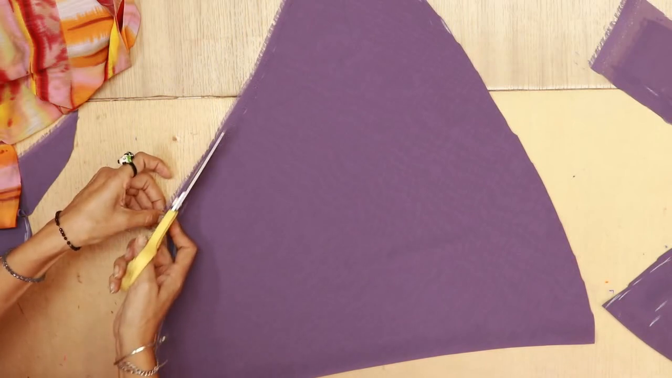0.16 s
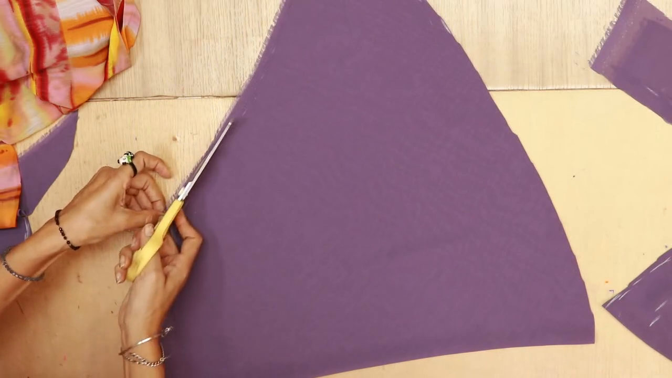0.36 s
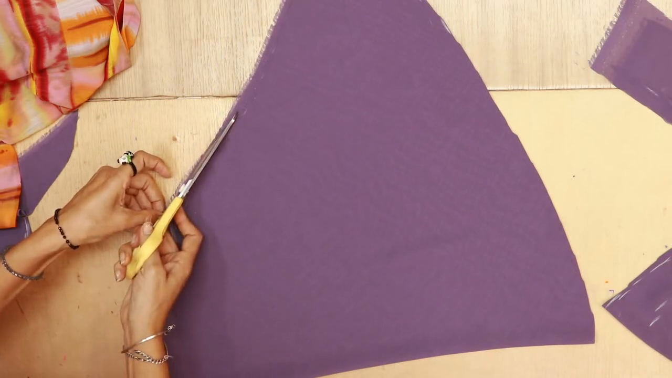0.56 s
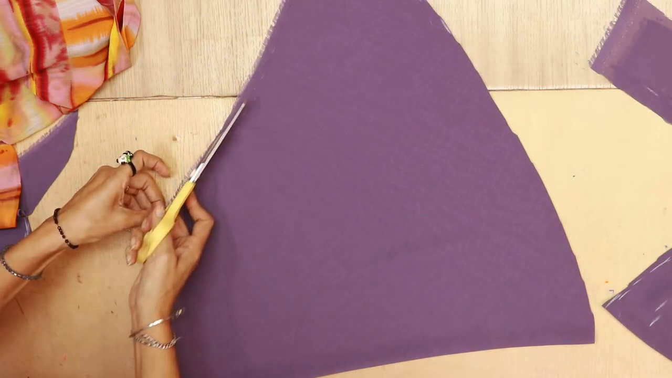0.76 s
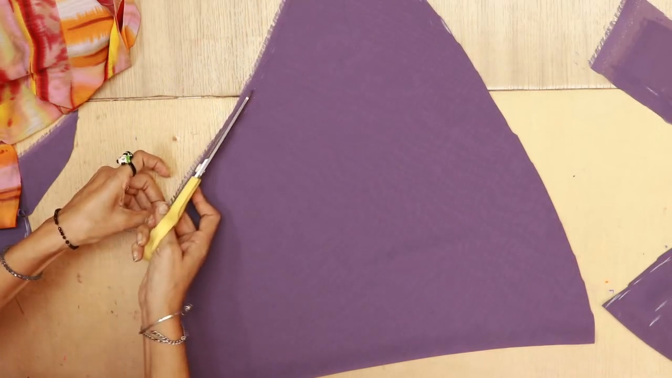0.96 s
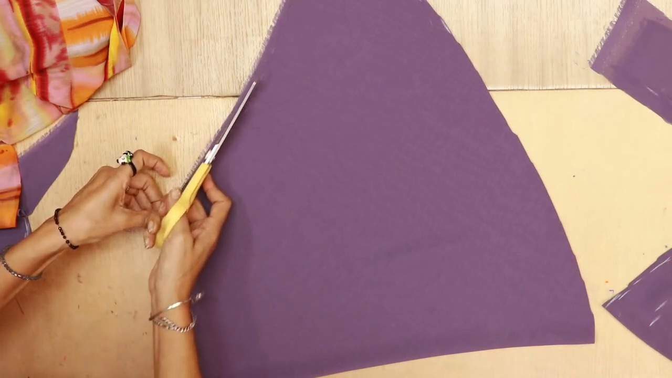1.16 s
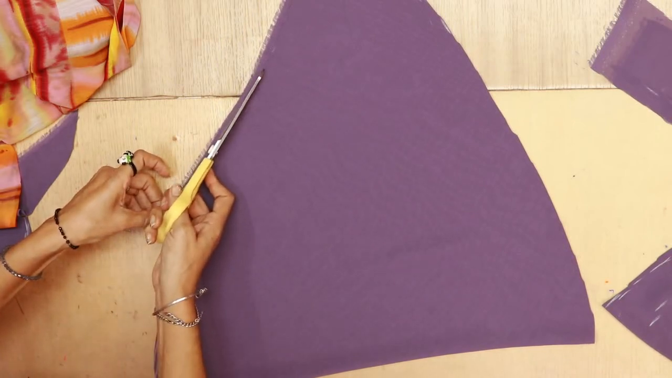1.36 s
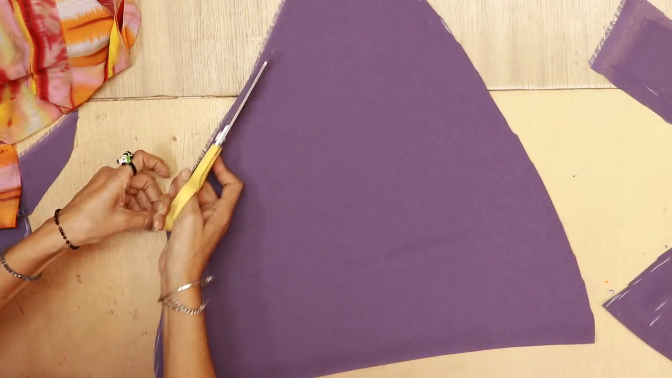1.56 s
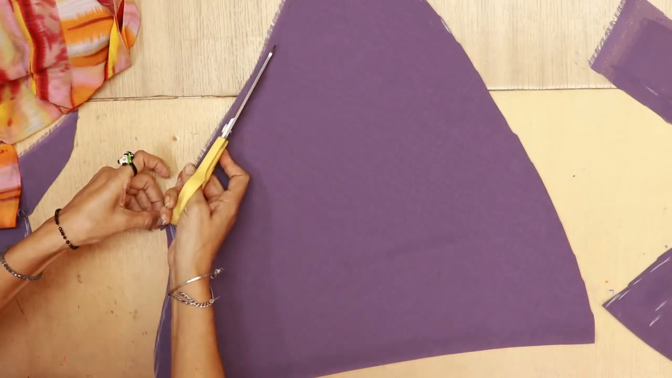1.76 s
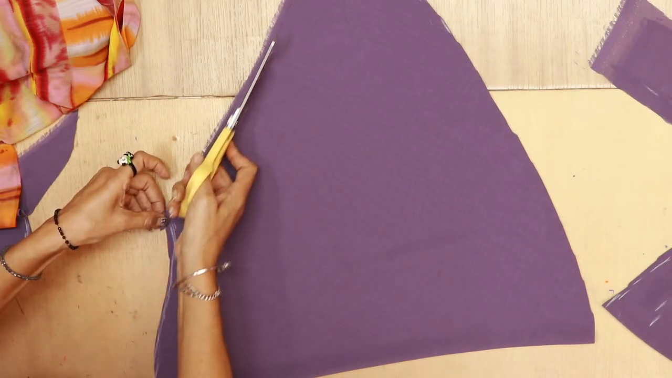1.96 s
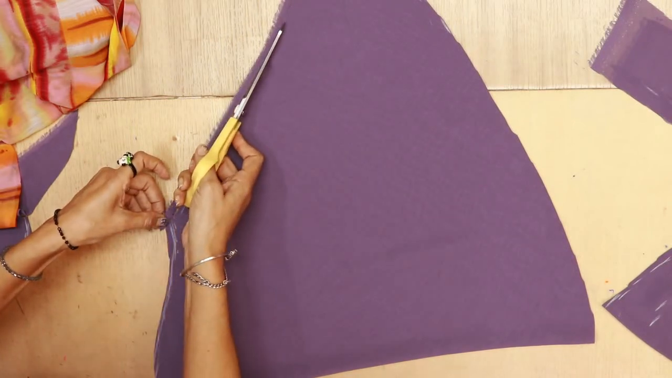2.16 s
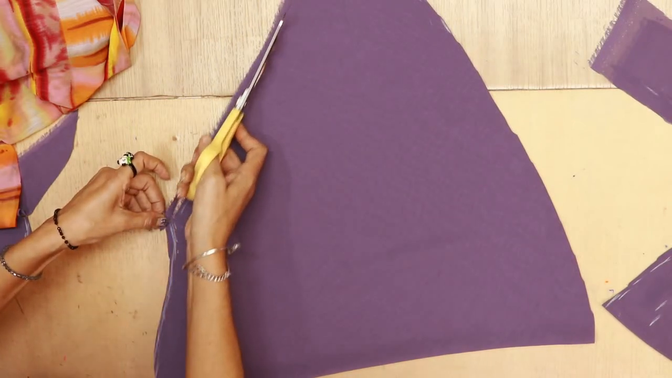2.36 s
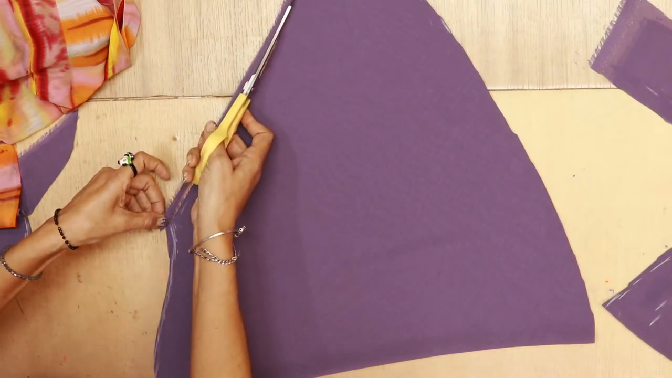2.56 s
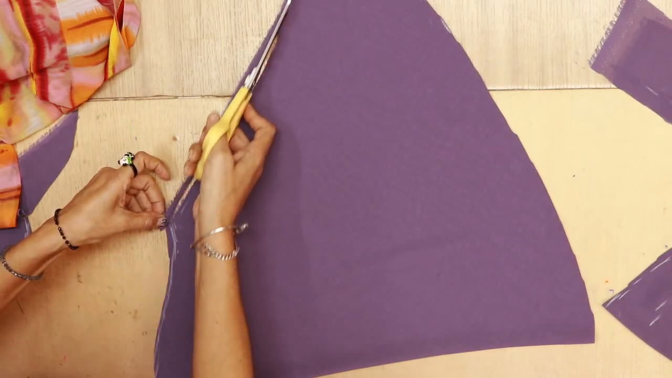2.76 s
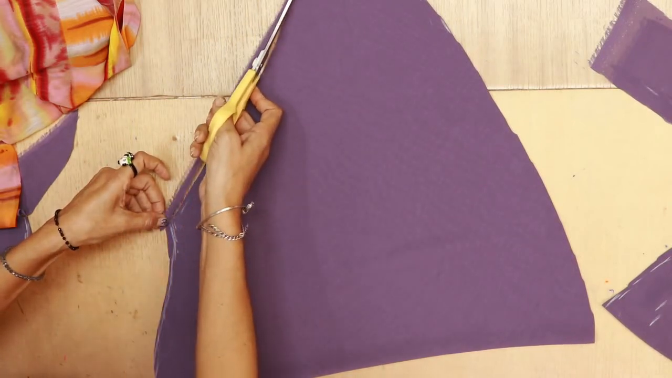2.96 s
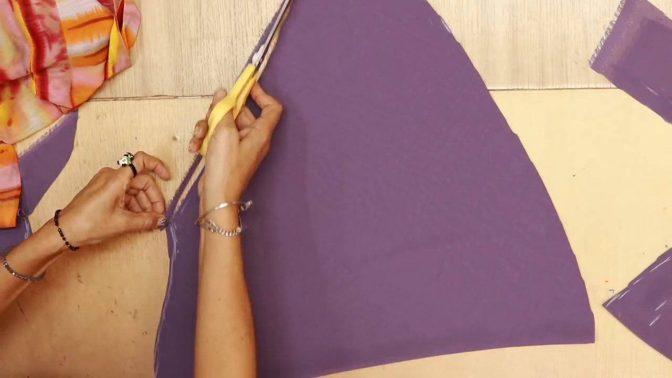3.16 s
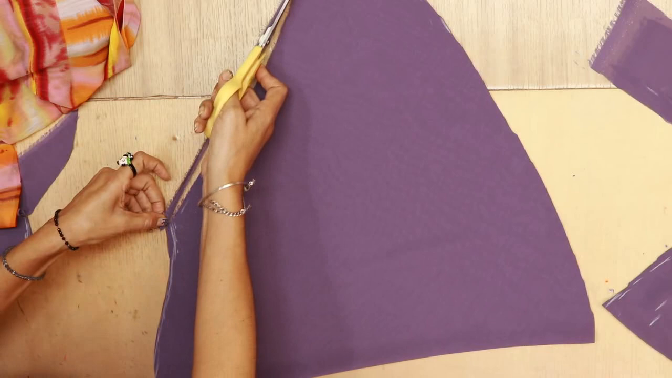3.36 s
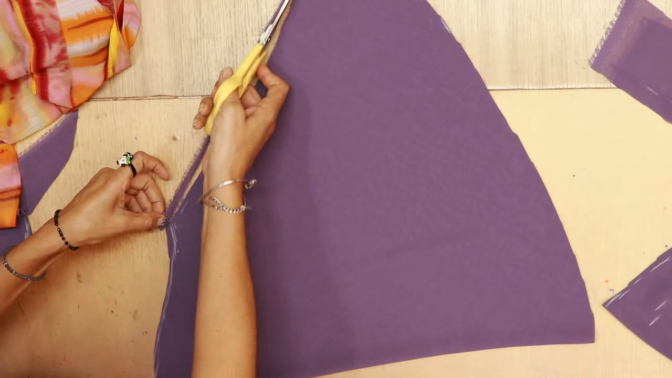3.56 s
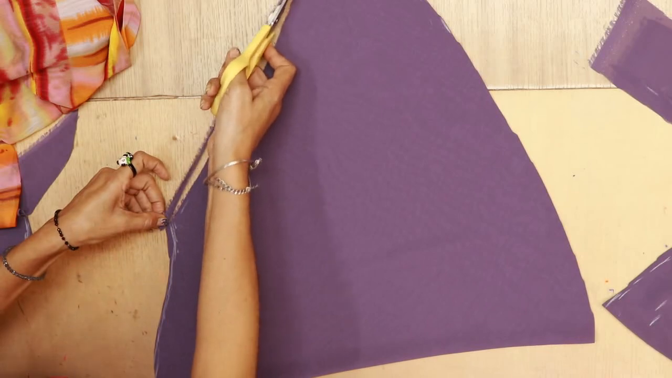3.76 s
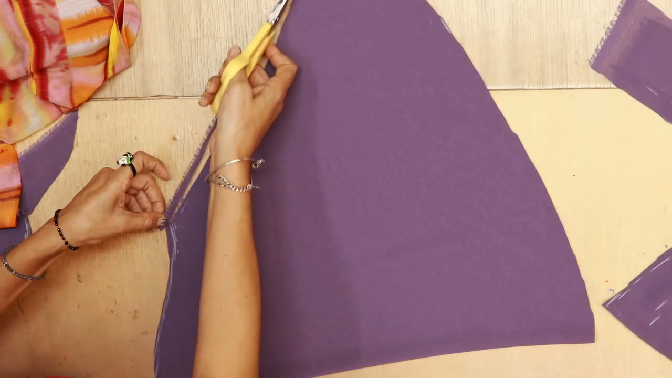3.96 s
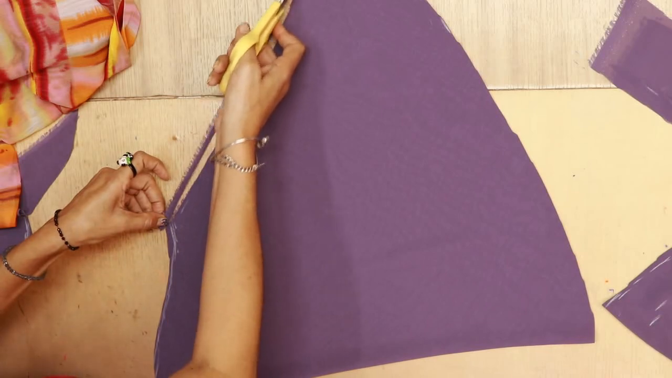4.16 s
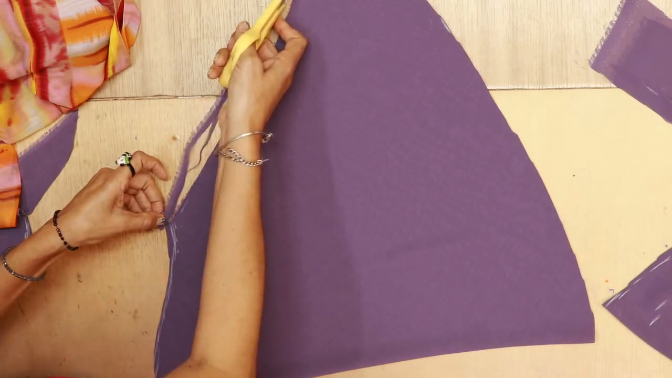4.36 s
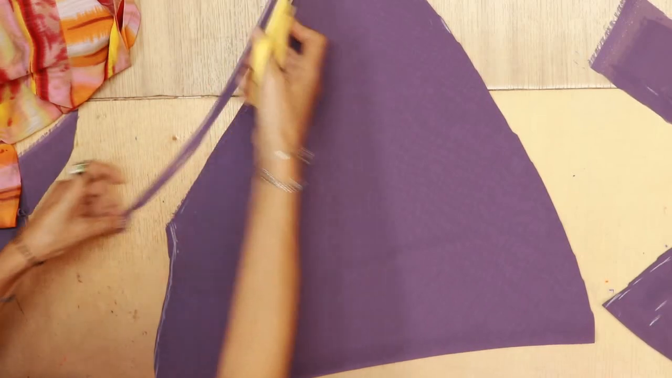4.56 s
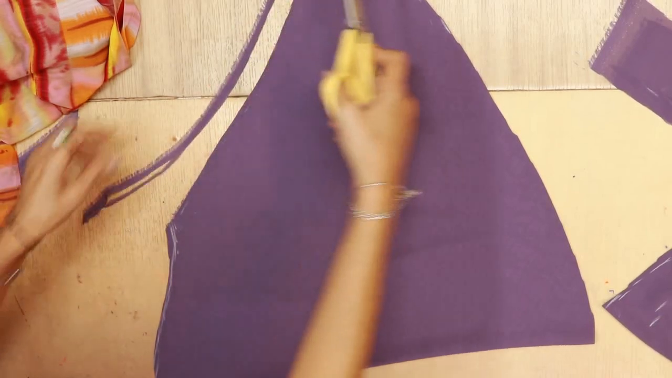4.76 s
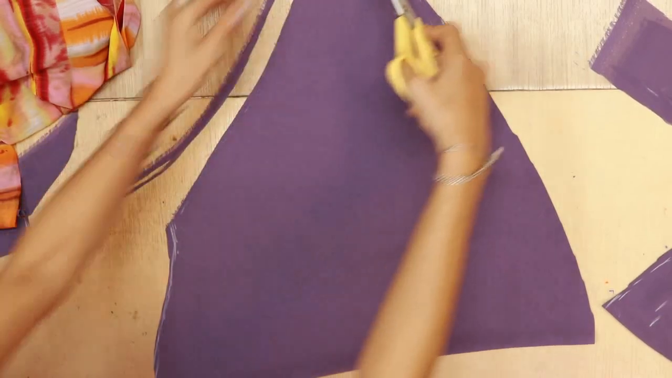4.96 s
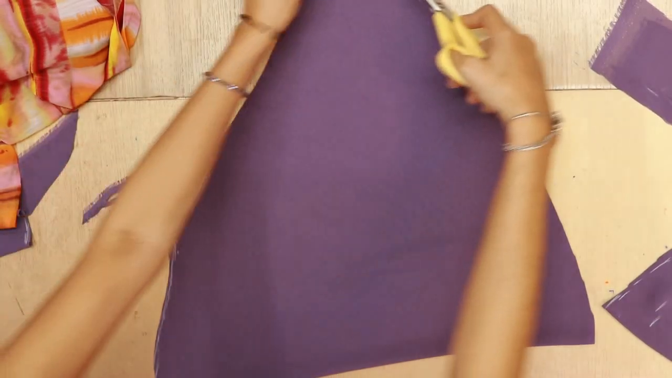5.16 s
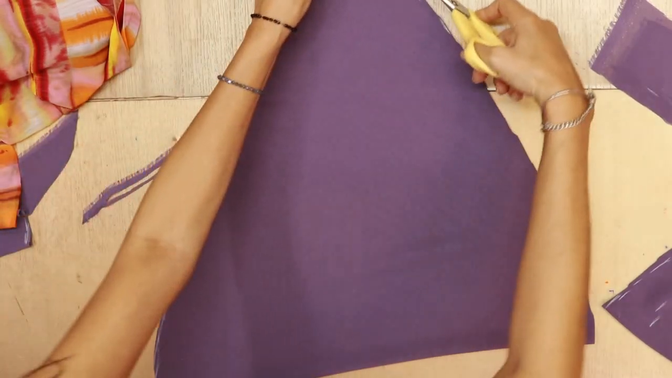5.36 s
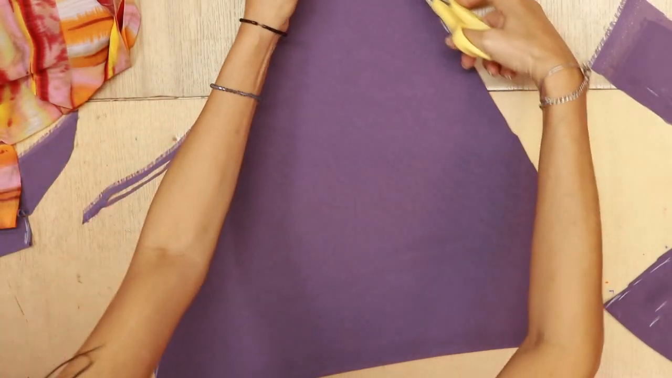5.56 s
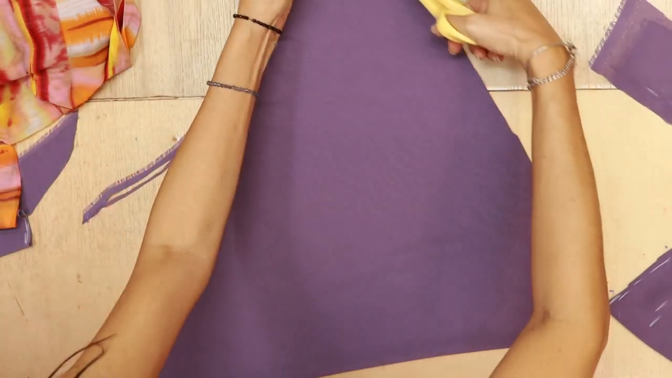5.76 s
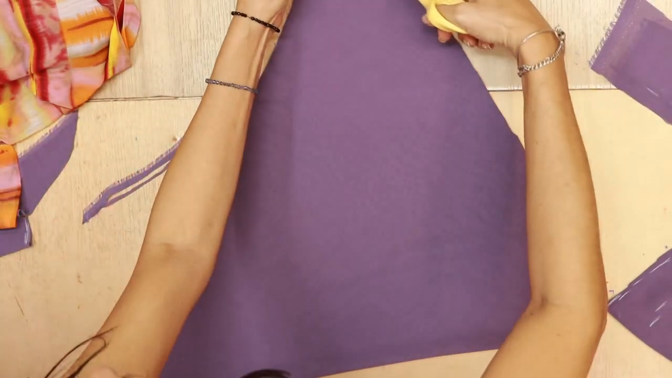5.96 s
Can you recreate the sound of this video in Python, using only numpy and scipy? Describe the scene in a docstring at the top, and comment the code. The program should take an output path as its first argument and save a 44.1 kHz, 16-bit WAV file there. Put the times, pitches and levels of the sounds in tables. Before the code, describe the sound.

A small, fairly dry room with low steady noise and a faint bass hum that swells around 3 s. Close stereo microphones catch tailor's scissors slightly left, drifting toward the middle. A cut is already biting at 0 s; others follow near 0.5, 0.95, 1.35, 1.8, 2.2, 2.6, 3.0, 3.5, 3.9 and 4.3 s. Each swells in with an edge hiss, then crunches through threads while the blade's jolts drum the wooden table; between cuts a softer reopening scrapes forward. Cuts gradually grow heavier, with small knocks near 1.4 and 3.9 s. At 4.33 s the blades shut with a bright, very short steel clack and heavy thud. A rough squeak follows at 4.5 s, then hands swish over cloth until about 5.8 s. Light jewellery ticks come at 5.2 s, a dull knock at 5.4 s, and a faint low squeak near 5.7 s.

```python
"""Tailor's scissors cut cloth in a small room, the lower blade resting on a wooden table, over noise and hum.
Cuts and reopenings alternate: snapping threads crackle in the blades, jolts drum in the table's decaying
modes, and each reopening scrapes forward more softly. The hum swells once midway. The last cut ends in a
steel clack, a few quick hits ringing the blades, with a heavy thud; squeaks follow as the blades reopen and
once near the end. Hands sweep the cloth (dense grains hiss), jewellery ticks, the scissors knock on the table."""
import sys
import numpy as np
from scipy import signal
from scipy.fft import rfft, irfft
from scipy.io import wavfile
from scipy.ndimage import uniform_filter1d, map_coordinates

SR = 44100
rng = np.random.default_rng(int(sys.argv[2]) if len(sys.argv) > 2 else 0)


def unload_wav(signal):
    """Save mono or channel-first audio to the path in sys.argv[1] as 16-bit WAV at rate SR, clipped to [-1, 1]."""
    wavfile.write(
        sys.argv[1],
        SR,
        np.round(np.clip(np.atleast_2d(signal).T, -1, 1) * 32767).astype(np.int16),
    )


N = 268569

# Closing strokes. Each row: bite in seconds, length in seconds, force as table boom in dB,
# table rattle in dB, edge hiss in dB.
CUT_STROKES = [(.008, 0.0081, -35.5, -32, -40), (.531, 0.063, -31, -31, -44.5),
               (0.947, .034, -28.5, -38.5, -44.5), (1.344, 0.069, -30, -38, -47),
               (1.793, 0.031, -26.5, -30, -45.5), (2.204, 0.064, -29.5, -27, -43.5),
               (2.626, 0.054, -25, -28, -42), (3.034, 0.074, -28.5, -31, -44),
               (3.468, 0.04, -25, -30.5, -41.5), (3.863, 0.086, -30.5, -30.5, -46),
               (4.287, 0.05, -24.5, -30, -36)]
# Reopening strokes. Each row: start in seconds, table boom in dB, table rattle in dB.
OPENING_STROKES = [(.096, -38, -37.5), (0.706, -38.5, -40), (1.125, -37.5, -52), (1.538, -36, -37),
                   (1.975, -35.5, -42.5), (2.396, -33.5, -38), (2.808, -34.5, -36), (3.211, -33.5, -38.5),
                   (3.65, -33, -43.5), (4.059, -32.5, -41), (4.507, -43.5, -68)]
# Modes of the table top. Each row: frequency in Hz, relative level in dB, t60 in seconds.
TABLE_MODES = [(58, -30, .5), (96, -25, .25), (165, -8, .09), (200, -5, .08), (230, 0, .17), (292, -3, .16),
               (368, -6, .1), (416, -3, .16), (486, -2, .16), (615, -7, .13), (686, -6, .12),
               (776, -7, .07), (915, -6, .08), (1009, -6, .11), (1057, -5, .11), (1116, -5, .11),
               (1255, -8, .05), (1400, -13, .05), (1560, -17, .035), (1730, -19, .035)]
# Spectrum of catching threads and of the clack's crack. Each row: frequency in Hz, relative density in dB per Hz.
CATCH_SPECTRUM = [(600, 9.5), (2400, 3), (3200, -3), (4500, 2), (6300, -3), (8000, -8), (11000, -15),
                  (16000, -28)]
# Spectrum of the rubbing edges. Each row: frequency in Hz, relative density in dB per Hz.
EDGE_SPECTRUM = [(3000, -42), (7500, -5), (9000, 4.5), (10500, 0), (11700, 3.5), (13300, -3.5), (16000, -3)]


def from_db(db):
    """Amplitude factor of a level in dB."""
    return 10 ** (np.asarray(db) / 20)


def rms_one(x):
    """Scale to unit power."""
    return x / np.sqrt(np.mean(x ** 2) + 1e-20)


def seconds():
    """Time of every sample."""
    return np.arange(N) / SR


def through(x, response):
    """Convolve a sound with an impulse response."""
    return signal.fftconvolve(np.atleast_2d(x), np.atleast_2d(response), axes=-1)[:, :N]


def unit_energy(response):
    """Scale a response so that it keeps the power of white noise."""
    return response / np.sqrt(np.sum(response ** 2))


def colour(spectrum, size=4096):
    """Causal (minimum-phase) response with the given spectrum, by folding the cepstrum."""
    hz, db = np.transpose(spectrum)
    grid = np.maximum(np.fft.rfftfreq(size, 1 / SR), 1)
    magnitude = from_db(np.interp(np.log(grid), np.log(hz), db))
    cepstrum = irfft(np.log(magnitude))
    cepstrum[1:size // 2] *= 2
    cepstrum[size // 2 + 1:] = 0
    return irfft(np.exp(rfft(cepstrum)))


def shaped(x, spectrum):
    """Colour a white sound and keep its power."""
    return through(x, unit_energy(colour(spectrum)))


def filtered(x, order, corner_hz, kind):
    """Butterworth filter."""
    return signal.sosfilt(signal.butter(order, corner_hz, kind, fs=SR, output="sos"), x)


def soften(x, corner_hz, order=1):
    """Take off the treble with a lowpass."""
    return filtered(x + 1e-18, order, corner_hz, "low")


def evened(x, size):
    """Hold the power steady over the given number of samples."""
    return x / np.sqrt(np.abs(uniform_filter1d(x ** 2, size=size)) + 1e-6)


def slow_noise(rate_hz):
    """Random wandering of spread 1: lowpassed noise."""
    return rms_one(filtered(rng.standard_normal(N), 2, rate_hz, "low"))


def rough_tone(hz, width_hz):
    """A tone whose strength and phase wander."""
    phase = 2 * np.pi * np.cumsum(hz * np.ones(N)) / SR
    in_phase = slow_noise(width_hz / 2) * np.cos(phase)
    return in_phase + slow_noise(width_hz / 2) * np.sin(phase)


def grains(per_s, spread_db, clump_db):
    """Random snaps of uneven size that come in clumps; unit power."""
    sizes = from_db(spread_db * rng.standard_normal(N)) * rng.choice([-1, 1], N)
    snaps = evened(sizes * (rng.random(N) < per_s / SR), size=440)
    clumps = from_db(clump_db * slow_noise(129))
    return rms_one(evened(snaps * clumps, size=1800))


def impulses(rows, column=1):
    """One click per row, as strong as the chosen dB column."""
    out, rows = np.zeros(N), np.array(rows)
    out[np.round(rows[:, 0] * SR).astype(int)] = from_db(rows[:, column])
    return out


def ringing(modes):
    """Response of a struck body: decaying sines of alternating sign."""
    t = np.arange(SR // 2) / SR
    total = 0
    for k, (hz, db, t60) in enumerate(modes):
        total += from_db(db - 60 * t / t60) * np.sin(2 * np.pi * hz * t) * (-1) ** k
    return unit_energy(total)


def stroke(start, stop, first_db, middle_db, last_db, t60):
    """A gain that sets in within about 2 ms, passes through three levels and dies away after the stop."""
    gain = np.zeros(N)
    at = np.arange(max(int(start * SR), 0), min(int((stop + t60) * SR), N))
    t = at / SR
    arch_db = np.interp(t, [start, (start + stop) / 2, stop], [first_db, middle_db, last_db])
    gain[at] = from_db(arch_db - 60 * np.maximum(t - stop, 0) / t60)
    return uniform_filter1d(gain, size=90)


def background(floor_db=-51.5, alike_hz=700, apart_db=-14.5):
    """Steady room noise: the side signal is weakened in the bass, so both channels are alike there."""
    # Each row: frequency in Hz, relative density in dB per Hz.
    noise_spectrum = [(20, -7), (40, -25), (57, 6), (72, -25.5), (110, 3), (160, -9.5), (300, -7),
                      (600, -14.5), (1200, -20), (3000, -25.5), (8000, -30), (16000, -38.5)]
    mid, side = rng.standard_normal((2, N))
    side = side - (1 - from_db(apart_db)) * soften(side, alike_hz)
    return from_db(floor_db) * shaped(mid + side * np.array([[1], [-1]]), noise_spectrum)


def hum(level_db=-60, swell_at_s=3.05, swell_width_s=0.63, swell_db=11):
    """A narrow, unsteady drone in the bass that swells once."""
    swell = np.exp(-((seconds() - swell_at_s) / swell_width_s) ** 2)
    drone = evened(rough_tone(hz=96.4, width_hz=16.0), size=9000)
    return from_db(level_db + swell_db * swell) * drone


def sweeping(pan_db=0.8, attack_s=0.039, fade_t60_s=0.16):
    """Skin on cloth: countless fibres make a smooth hiss over the duller rustle of the folds."""
    # Hand strokes. Each row: start in seconds, length in seconds, hiss in dB, rustle in dB.
    hand_strokes = [(4.468, 0.14, -51.5, -58.5), (4.679, 0.15, -50.5, -56.5), (4.92, 0.0098, -56.5, -49),
                    (5.005, 0.57, -60.5, -65.5), (5.391, 0.32, -49.5, -72)]
    # Fibres, then folds. Each row: frequency in Hz, relative density in dB per Hz.
    fibre_spectrum = [(400, -6), (1400, -5), (2200, 6.5), (4500, 5.5), (7000, -0.5), (11000, -3.5),
                      (15000, -16)]
    fold_spectrum = [(150, -16), (400, -9), (800, 2), (1500, 5), (2500, -9), (6000, -20)]
    t, fibres, folds = seconds(), 0, 0
    for start, length, hiss_db, rustle_db in hand_strokes:
        rise = np.clip(1 + (t - start) / attack_s, 0, 1)  # full at the start time
        fade = from_db(-60 * np.maximum(t - start - length, 0) / fade_t60_s)
        fibres += from_db(hiss_db) * rise * fade
        folds += from_db(rustle_db) * rise * fade
    hiss = shaped(fibres * grains(per_s=16000, spread_db=1.5, clump_db=1.5), fibre_spectrum)
    rustle = shaped(folds * grains(per_s=5000, spread_db=-2.0, clump_db=2.5), fold_spectrum)
    return (hiss + rustle) * from_db([[-pan_db], [pan_db]])


def squeaks():
    """Stick and slip of rubbing steel gives rough, gliding tones that swell and fade."""
    # Each row: start in seconds, length in seconds, first Hz, last Hz, width in Hz, level in dB.
    squeak_rows = [(4.505, .1, 2450, 3000, 400, -48), (4.515, .06, 7800, 8600, 2000, -47),
                   (4.57, .032, 7600, 6400, 450, -47), (4.52, .12, 920, 950, 60, -52),
                   (5.645, .21, 910, 890, 70, -55)]
    t, out = seconds(), np.zeros(N)
    for start, length, first_hz, last_hz, width_hz, db in squeak_rows:
        progress = np.clip((t - start) / length, 0, 1)
        hz = first_hz + (last_hz - first_hz) * progress
        tone = evened(rough_tone(hz, width_hz), size=1300)
        out += from_db(db) * np.sin(np.pi * progress) * tone
    return out


def blows(contact_hz=340, thud_trim_db=-2.0):
    """A hard contact ticks and the table modes answer a softened click with a thud."""
    # Each row: time in seconds, sharp tick in dB, thud in dB before trim and softening.
    blow_rows = [(.849, -53, -7.5), (1.412, -11, 4.5), (3.938, -40, 7), (4.314, -45, -2),
                 (4.332, 1.5, 12.5), (5.1862, -15, -7.5), (5.1995, -13, -12), (5.2185, -12, -4.5),
                 (5.3922, -28, 9), (5.876, -55, -12)]
    # Each row: frequency in Hz, relative density in dB per Hz.
    tick_spectrum = [(300, -7), (1700, 16.5), (3200, 19.5), (4600, 25), (6500, 17.5), (9000, 11.5),
                     (12000, 3), (16000, -18)]
    pushes = soften(impulses(blow_rows, column=2), contact_hz, order=2)
    thud = through(pushes, ringing(TABLE_MODES))
    return from_db(thud_trim_db) * thud + shaped(impulses(blow_rows), tick_spectrum)


def clack(crack_db=-8.0):
    """The blades meet their stop in a few quick hits: a crack, set relative to a short steely ring."""
    # Each row: time in seconds, ring level in dB.
    clack_rows = [(4.3255, -11), (4.3320, -5), (4.3328, -2.5), (4.3357, -14), (4.3425, -18)]
    # Steel damped by the hand. Each row: frequency in Hz, relative level in dB, t60 in seconds.
    blade_modes = [(2300, -2, .004), (4850, 1, .005), (5850, 0, .004), (6700, -5, .003), (8950, -5, .004)]
    hits = impulses(clack_rows)
    return through(hits, ringing(blade_modes)) + from_db(crack_db) * shaped(hits, CATCH_SPECTRUM)


def drumming(boom, rattle, per_s, knock_db, split_hz=680, shift_db=5.5):
    """Small jolts of the lower blade ring the table: a boom in its low modes, a rattle in its high ones."""
    jolts = grains(per_s, spread_db=4.5, clump_db=4.0)
    knocks = filtered(jolts, 2, [170, 1400], "band")
    # as the blade travels it favours different sets of modes
    rings = 0
    for k in range(4):
        modes = TABLE_MODES[k::4]
        strength = np.sqrt(sum(from_db(db) ** 2 * t60 for hz, db, t60 in modes))
        favour = from_db(shift_db * slow_noise(5.0))
        rings += strength * through(jolts, ringing(modes))[0] * favour
    wood = rms_one(rings) + from_db(knock_db) * rms_one(knocks)
    low = filtered(wood, 3, split_hz, "low")
    high = filtered(wood, 3, split_hz, "high")
    # the wood's power is held steady, so the stroke gains alone set its loudness
    return boom * evened(low, size=1100) + rattle * evened(high, size=1100)


def reopening(wood_t60_s=0.25, scrape_db=-46, open_s=0.08, slows_s_per_s=0.0022):
    """The blades are pushed forward over the wood and scrape on each other as they part."""
    # Each row: frequency in Hz, relative density in dB per Hz.
    scrape_spectrum = [(800, 13), (1800, -11), (2500, 10), (3300, -6), (4600, -5), (6000, -5), (8600, 0),
                       (10400, -12), (11500, -5), (13000, -19), (16000, -11)]
    boom = rattle = scrape = 0
    for start, boom_db, rattle_db in OPENING_STROKES:
        # takes a little longer as the arm reaches further
        stop = start + open_s + slows_s_per_s * start
        push = stroke(start, stop, -6, 0.27, -6.5, wood_t60_s)
        boom += from_db(boom_db) * push
        rattle += from_db(rattle_db) * push
        scrape += stroke(start, stop, -2.0, 0, -24, t60=0.022)
    wood = drumming(boom, rattle, per_s=1900, knock_db=-16.0)
    burrs = grains(per_s=1100, spread_db=5.0, clump_db=4.0)
    return wood + from_db(scrape_db) * shaped(scrape * burrs, scrape_spectrum)


def catches(crunch_trim_db=0.5, edge_trim_db=-1.5, t60=0.0045):
    """A caught thread or burr gives way in tiny snaps: before bites, in reopenings, at tough threads."""
    # Tough threads. Each row: start in seconds, crunch in dB before trim.
    tough_threads = [(.008, -35.5), (0.114, -42), (.577, -31), (1.407, -31), (1.766, -42), (2.623, -35),
                     (3.05, -30.5), (3.905, -30), (4.279, -42)]
    # bursts: (start s, length s, crunch dB, edge hiss dB), both levels before trim
    bursts = []
    for bite, *_ in CUT_STROKES:  # the edges meet
        bursts.append((max(bite - 0.0191, 0), 0.0064, -45.5, -46))
    for start, *_ in OPENING_STROKES:  # a burr catches at a scattered time
        scatter_s = 0.013 * rng.uniform(-1.11, 1)
        bursts.append((start + 0.0403 + scatter_s, 0.0047, -44.5, -43))
    for start, db in tough_threads:
        bursts.append((start, 0.0075, db, -41.5))
    crunch = edge = 0
    for start, length, threads_db, hiss_db in bursts:
        burst = stroke(start, start + length, 0.46, 0, -2.0, t60)
        crunch += from_db(threads_db + crunch_trim_db) * burst
        edge += from_db(hiss_db + edge_trim_db) * burst
    crunch_snaps, edge_snaps = [grains(per_s=7700, spread_db=4.0, clump_db=-1.0) for _ in range(2)]
    return shaped(crunch * crunch_snaps, CATCH_SPECTRUM) + shaped(edge * edge_snaps, EDGE_SPECTRUM)


def cutting(slide_db=-10.5, slide_s=0.055, wood_t60_s=0.25, steel_t60_s=0.053):
    """The blade slides in, swelling, then bites: edges hiss first, the crunch of threads follows."""
    # Each row: frequency in Hz, relative density in dB per Hz.
    crunch_spectrum = [(700, 19.5), (1500, -12.5), (2500, 9), (3300, -1.5), (5000, 1), (6300, -5),
                       (7600, -5), (11000, -34), (16000, -13)]
    # crunch of a cut of usual force, and the share of the force in dB that it follows
    crunch_db, usual_force_db, crunch_follows = -33.5, -29.5, 0.52
    boom = rattle = crunch = edge = 0
    for bite, length, force_db, rattle_db, hiss_db in CUT_STROKES:
        stop = bite + length
        threads_db = crunch_db + crunch_follows * (force_db - usual_force_db)
        lead_in = from_db(slide_db) * stroke(bite - slide_s, bite, -19, -1.3, 0.62, t60=0.0096)
        boom += from_db(force_db) * (lead_in + stroke(bite, stop, 0, 0, -2, wood_t60_s))
        rattle += from_db(rattle_db) * (lead_in + stroke(bite, stop, -4, 0, -2.0, t60=0.16))
        crunch += from_db(threads_db) * (0.5 * lead_in + stroke(bite, stop, -6, 0, -6.5, steel_t60_s))
        edge += from_db(hiss_db) * (0.5 * lead_in + stroke(bite, stop, 2.6, -14.5, -14, steel_t60_s))
    wood = drumming(boom, rattle, per_s=700, knock_db=-15.5)
    snaps = grains(per_s=800, spread_db=5.0, clump_db=4.0)
    burrs = grains(per_s=1600, spread_db=5.0, clump_db=3.5)
    return wood + shaped(crunch * snaps, crunch_spectrum) + shaped(edge * burrs, EDGE_SPECTRUM)


def room(far, near, near_db=-2.5, t60=0.2, first_wall_s=0.0028):
    """Direct sound reaches two microphones a little apart; a short diffuse tail follows, weaker for near."""
    # Reverberation against direct sound. Each row: frequency in Hz, level in dB.
    tail_spectrum = [(60, 7.5), (200, -20.5), (350, -23), (700, -2), (1200, -3.5), (3000, 1), (8000, 0),
                     (16000, -4.5)]
    # The scissors stay on the left and drift toward the middle.
    # Each row: time in seconds, lag of the right side in samples.
    bearing = [(0, 1.67), (2, 1.4), (4.001, 0.81), (6, 0.84)]
    t, dry = np.arange(SR // 2) / SR, far + near
    decay = from_db(-60 * t / t60) * (t > first_wall_s)
    tails = np.array([unit_energy(rng.standard_normal(len(t)) * decay) for side in range(2)])
    lag = np.interp(seconds(), *np.transpose(bearing))
    direct = np.array([dry[0], map_coordinates(dry[1], [np.arange(N) - lag], order=3)])
    sent = through(far + from_db(near_db) * near, colour(tail_spectrum))
    heard = direct + through(sent, tails)
    # direct sound and tail share the power
    share = [(hz, -10 * np.log10(1 + from_db(db) ** 2)) for hz, db in tail_spectrum]
    return through(heard, colour(share))


def scene():
    """Scissors, table and cloth in the room, over hum and noise."""
    scissors = cutting() + catches() + reopening() + clack() + squeaks()
    return room(scissors + sweeping(), near=blows()) + hum() + background()


def record(dry):
    """The deepest bass is rolled off and the top is cut steeply."""
    lean = filtered(dry, 3, 42, "high")
    # order 10, 0.1 dB ripple, 80 dB stopband, corner in Hz
    return signal.sosfilt(signal.ellip(10, 0.1, 80, 15850, fs=SR, output="sos"), lean)


dry = scene()
out = record(dry)
unload_wav(out)
```